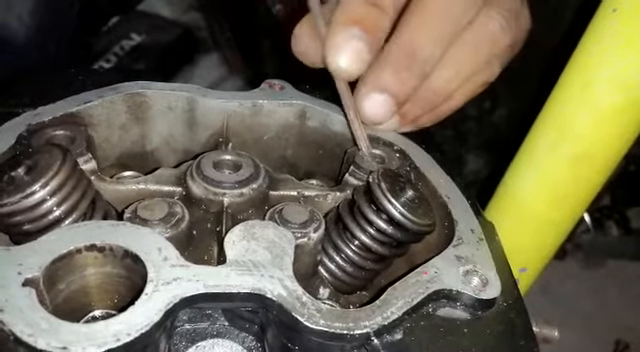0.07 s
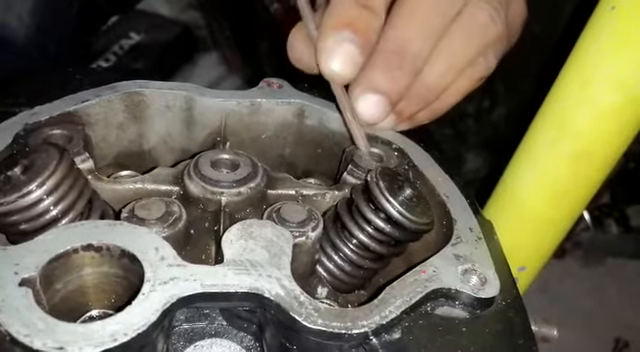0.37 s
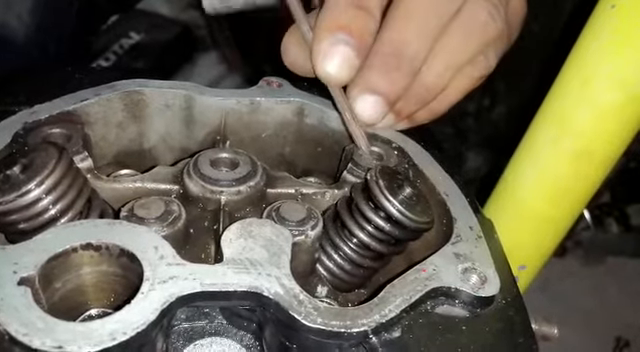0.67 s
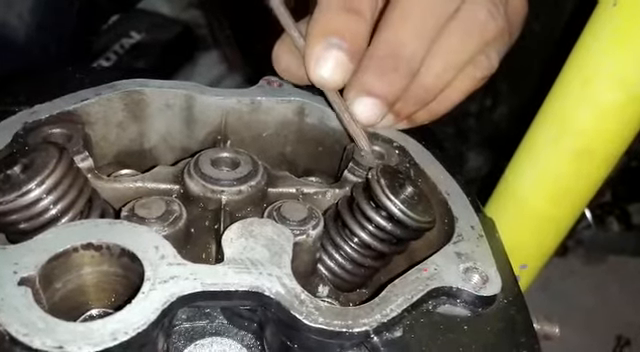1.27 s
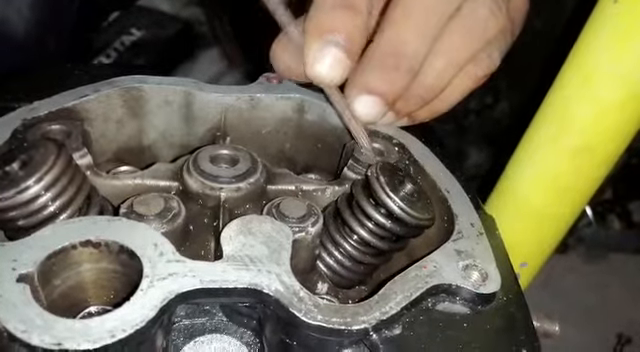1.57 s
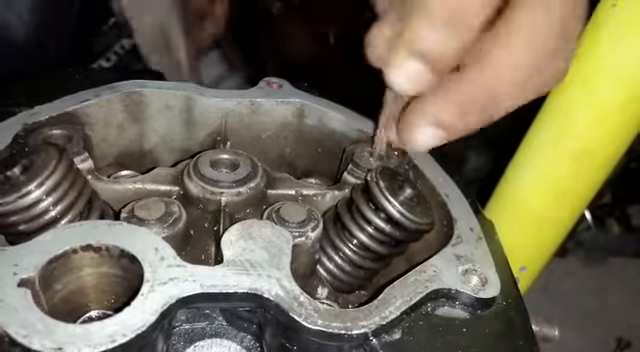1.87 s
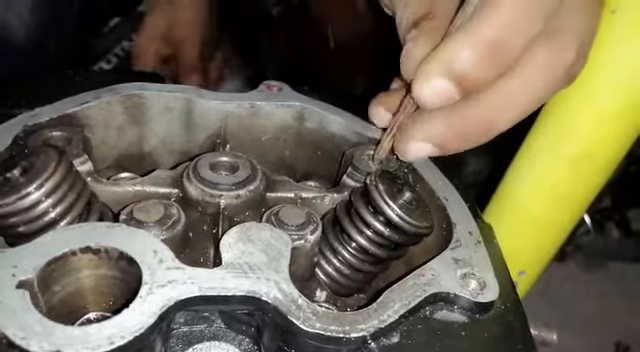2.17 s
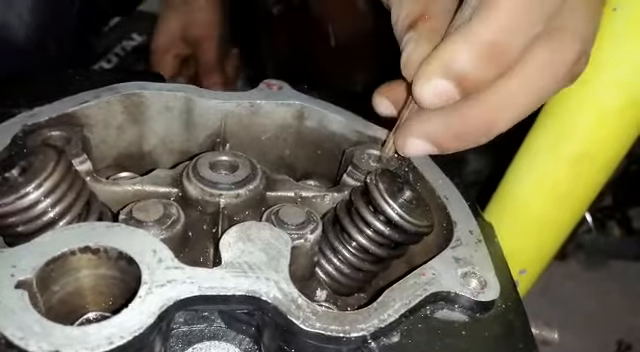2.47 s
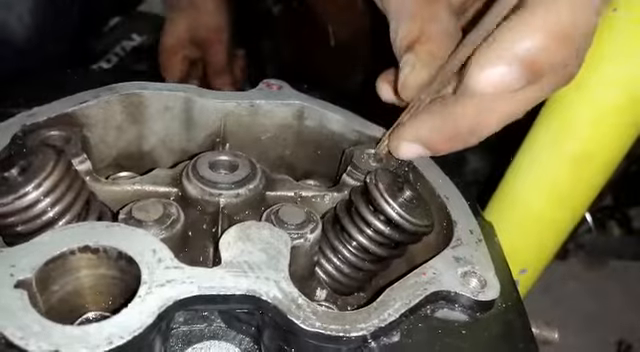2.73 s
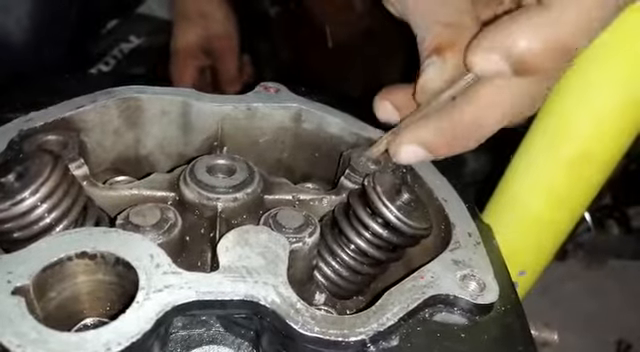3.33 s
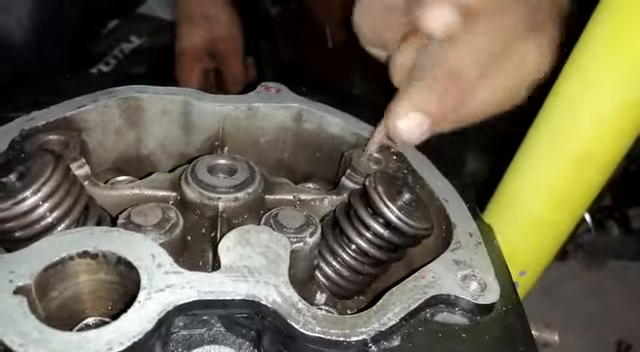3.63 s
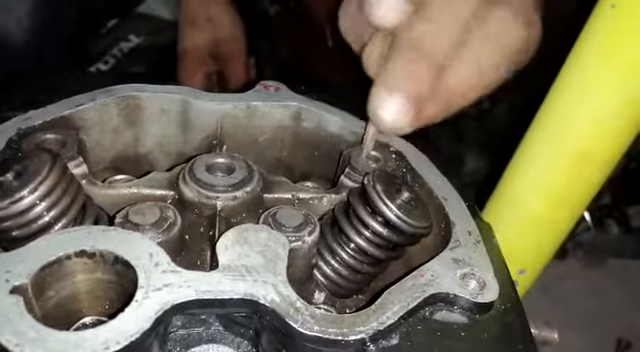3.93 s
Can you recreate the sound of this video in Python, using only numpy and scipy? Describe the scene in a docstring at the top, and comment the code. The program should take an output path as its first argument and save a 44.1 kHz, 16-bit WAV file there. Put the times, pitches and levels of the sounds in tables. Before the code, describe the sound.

A thin steel tool clicks several times against an engine's valve spring, each click ringing briefly. Outside the workshop a small vehicle putters past and fades, leaving a few fainter ticks. The sound sits mostly on the left.

```python
"""A small one-cylinder vehicle putters outside a workshop; it eases off, pulls past and fades away.
Over it come dry clicks, the main sound: a thin steel tool picks at the top of a valve spring on an
open cylinder head, and tool and spring ring briefly. Each click is bursts of noise plus dying tones.
The vehicle is a stack of exhaust tones over throbbing noise. Far traffic and a machine hum lie behind.
The left microphone hears everything far louder than the right."""
import sys
import numpy as np
from scipy import signal
from scipy.fft import rfft, irfft
from scipy.io import wavfile

SR = 44100
rng = np.random.default_rng(int(sys.argv[2]) if len(sys.argv) > 2 else 0)


def generate_wav(sig):
    """Save sig (samples, or channels by samples) to the path in sys.argv[1] as 16-bit PCM at SR."""
    pcm = np.round(np.clip(np.atleast_2d(sig).T, -1, 1) * 32767).astype(np.int16)
    wavfile.write(sys.argv[1], SR, pcm)


N = 176400  # 4 s

# tool clicks: t/s, then level/dB of casting knock, tip crack, tool ring, cap ring, coil zing, clack
CLICKS = [(0.4065, -21, -9.5, -18, -10, -13, -1.5), (0.607, -3.5, -5, -2, -1.5, -16, -8),
          (0.854, -6.5, -18.5, -7, -8, -27, -3.5), (1.0643, -4, -0.5, 3, 4.5, -17, -9),
          (1.2933, -1, 2.5, 3.5, 0, -7, -7), (1.5069, 0.5, -1, 1, 3, 0, -1),
          (2.549, -35, -19.5, -19, -16, -38, -17), (3.2005, -22, -11, -28, -10, -1, -13.5)]
# faint slips of the tool tip: t/s, level/dB
SLIPS = [(2.3044, -24), (2.322, -29.5), (2.543, -26), (2.6702, -23.5), (2.8937, -32), (3.1091, -33)]
# tone colour of the four noise bursts in a click: f/Hz, level/dB per Hz
CASTING_KNOCK = [(250, -72), (420, -52.5), (630, -49.5), (1400, -61.5), (3200, -79.5), (4500, -100)]
TIP_CRACK = [(1500, -68.5), (4400, -72), (6400, -65), (8200, -74.5), (9200, -67.5), (12200, -64),
             (15000, -68), (15600, -84)]
RETAINER_CLACK = [(3800, -92), (4400, -66), (5350, -66), (6200, -94)]  # the retainer is the disc that holds the spring
COIL_ZING = [(8400, -86.5), (11400, -62.5), (12400, -58.5), (13600, -77)]
# tones at which tool, valve cap and spring ring: f/Hz, level/dB, time to fade by 60 dB/s
TOOL_TONES = [(9052, -38.5, .1), (9760, -49, .09)]
CAP_TONES = [(5873, -36, .075), (6625, -44.5, .12), (7412, -49, .08)]
SPRING_TONES = [(5110, -44, .12), (5762, -47, .11)]

# engine speed as firings per second: t/s, f/Hz
FIRING_RATE = [(0, 37.9), (.36, 39), (.5, 33), (.62, 30.6), (.85, 32.4), (1.35, 33.2), (1.68, 33.9),
               (2.05, 32.9), (2.85, 31.9), (3.2, 31), (4, 30.4)]
# exhaust tones at 2, 4, 5 and 9 times the firing rate, and the high ones as a group: t/s, level/dB
SECOND_LEVEL = [(0, -42.5), (.6, -42.5), (1, -34), (1.35, -26.5), (1.54, -25), (1.71, -52.5),
                (1.871, -32.5), (2.08, -57.5), (2.41, -32), (2.65, -44.5), (4, -54.5)]
FOURTH_LEVEL = [(0, -36), (0.399, -26), (.6, -42.5), (1.299, -33.5), (2.05, -58), (2.4, -51), (2.9, -32),
                (4, -40)]
FIFTH_LEVEL = [(0, -26.5), (.36, -23), (.58, -32), (1, -18.5), (1.27, -20), (1.38, -28.5), (1.48, -21),
               (1.65, -34), (1.768, -22), (2.3, -26), (2.42, -38.5), (2.8, -36), (3.2, -43), (4, -45)]
NINTH_LEVEL = [(0, -33), (.6, -49), (1.1, -33.5), (1.2, -19.5), (1.48, -16.5), (1.9, -38), (4, -61.5)]
HIGH_LEVEL = [(0, -40.5), (.6, -42), (1.03, -22), (1.74, -21.5), (2, -31), (2.7, -45), (4, -59.5)]
# more exhaust tones: multiple of the firing rate, level/dB added to FIFTH_LEVEL (low) or HIGH_LEVEL (high)
LOW_TONES = [(1, -27), (3, -24.5), (6, -9), (7, -31.5)]
HIGH_TONES = [(8, -6.5), (10, -12), (11, -7.5), (12, -19.5), (13, -22.5), (14, -15), (15, -27)]
# exhaust and tyre noise as the vehicle passes: t/s, roar level/dB, hiss level/dB
PASS_LEVELS = [(0, -6.5, -10.5), (.36, -6.5, -9.5), (.55, -19.5, -13.5), (.88, 1.5, -2.5), (1.3, 2.5, 2.5),
               (1.55, 2.5, 3), (1.71, -3, -5), (1.87, -5.5, -9), (2.05, -18.5, -13.5), (2.5, -18.5, -16.5),
               (4, -36, -20)]
# sizzle, strongest just after the vehicle passes: t/s, level/dB
SIZZLE_LEVEL = [(.55, -32), (.8, -5), (1.639, 3), (2.05, -27.5), (4, -27)]
# tone colour of the vehicle's three noises: f/Hz, level/dB per Hz
ROAR_COLOUR = [(30, -77), (100, -70), (170, -49.5), (380, -56), (540, -65), (700, -65.5), (1000, -76.5),
               (1500, -87.5), (6000, -125)]
HISS_COLOUR = [(800, -105), (1500, -97), (2700, -92), (4500, -100), (8200, -104), (10000, -100.5),
               (15500, -107.5)]
SIZZLE_COLOUR = [(4500, -115), (5600, -89), (7300, -99), (8200, -118)]
# narrow bands of gear whine: f/Hz, level/dB added to the hiss level
GEAR_BANDS = [(2150, -61.5), (3210, -59.5)]

# far traffic heard in the workshop: f/Hz, level/dB per Hz
FAR_TRAFFIC = [(20, -74.5), (90, -65), (135, -61), (200, -73.5), (350, -76), (500, -83.5), (750, -86.5),
               (1200, -94.5), (2000, -103), (3200, -102), (3900, -110), (5300, -107), (7500, -119),
               (15000, -118)]
# tones of a humming machine: f/Hz, level/dB
MACHINE_HUM = [(333.8, -58.5), (667.5, -60), (1001, -67)]
# the right microphone compared with the left: f/Hz, level/dB
RIGHT_MIC_COLOUR = [(60, -7), (160, -13), (320, -10.5), (600, -18.5), (2000, -21.5), (6000, -37.5),
                    (15000, -27.5)]
# each microphone's own hiss: f/Hz, level/dB per Hz
MIC_HISS = [(20, -74.5), (600, -104), (1500, -111), (3200, -111), (3900, -118), (7800, -124), (15000, -116)]

ATTACK_S, ROOM_T60_S = 0.00093, 0.2  # a "t60" is the time a sound takes to fade by 60 dB
RING_SPREAD_DB, SLIP_CRACK_DB = 2, -1.5
SPEED_JITTER, PUFF_DEPTH = 0.007, 0.11  # shares of the firing rate and of the noise strength
FADING_DB, ROUGH_DB, FLUTTER_DB = 2.3, 0.9, 1.6  # typical size of the random wobbles in level
WHINE_WIDTH_HZ, DOPPLER_SHARE, CLOSEST_S, PASSING_S = 140, 0.044, 1.3, 0.13
SHARED_BASS_HZ, RIGHT_LEAD_S, SCATTER_S, CUTOFF_HZ = 407, 0.00096, 0.0061, 15850


def tool():
    """Steel strikes steel: each click is four short noises plus the ring of tool, cap and spring."""
    times, knock_db, crack_db, tool_db, cap_db, zing_db, clack_db = np.transpose(CLICKS)
    slips = strikes(*np.transpose(SLIPS))
    cracks = strikes(times, crack_db) + from_db(SLIP_CRACK_DB) * slips
    sound = burst(strikes(times, knock_db), CASTING_KNOCK, t60=0.057, room_db=-7.5)
    sound += burst(cracks, TIP_CRACK, t60=0.038, room_db=-25)
    sound += burst(strikes(times, clack_db) + slips, RETAINER_CLACK, t60=0.038, room_db=-25)
    sound += burst(strikes(times, zing_db), COIL_ZING, t60=0.027, room_db=-25)
    # slips also brush the cap and the spring into ringing, but not the tool
    parts = [(TOOL_TONES, tool_db, 0), (CAP_TONES, cap_db, slips), (SPRING_TONES, clack_db, slips)]
    for tones, blow_db, brush in parts:
        for hz, db, t60 in tones:
            uneven_db = RING_SPREAD_DB * rng.standard_normal(len(times))
            blows = strikes(times + ATTACK_S, blow_db + uneven_db)
            sound += from_db(db) * ring(blows + brush, hz, t60)
    return sound


def vehicle():
    """The exhaust drones, while roar, hiss, whine and sizzle throb with each firing of the engine."""
    firing_hz = over_time(FIRING_RATE) * (1 + SPEED_JITTER * wobble(9.3))
    phase = 2 * np.pi * np.cumsum(firing_hz) / SR  # one turn per firing
    drone = exhaust(phase)
    roar = from_db(over_time(PASS_LEVELS, column=1)) * noise(ROAR_COLOUR)
    hiss = from_db(over_time(PASS_LEVELS, column=2)) * (noise(HISS_COLOUR) + gear_whine())
    sizzle = from_db(over_time(SIZZLE_LEVEL) + FLUTTER_DB * wobble(28)) * noise(SIZZLE_COLOUR)
    roughness = from_db(ROUGH_DB * wobble(17))  # firings are not all equally strong
    throb = 1 + PUFF_DEPTH * np.cos(phase)
    return drone * roughness + throb * (roar + hiss + sizzle)


def exhaust(phase):
    """Regular puffs make tones at multiples of the firing rate; each swells and fades along the way."""
    tones = [(2, over_time(SECOND_LEVEL)), (4, over_time(FOURTH_LEVEL)),
             (5, over_time(FIFTH_LEVEL)), (9, over_time(NINTH_LEVEL))]
    tones += [(multiple, over_time(FIFTH_LEVEL) + db) for multiple, db in LOW_TONES]
    tones += [(multiple, over_time(HIGH_LEVEL) + db) for multiple, db in HIGH_TONES]
    drone = 0
    for multiple, db in tones:
        strength = from_db(db + FADING_DB * wobble(5.24))
        drone += strength * np.sin(multiple * phase + 2 * np.pi * rng.random())
    return drone


def gear_whine():
    """Gears whine in narrow bands of noise that drop in pitch as they go by (the Doppler effect)."""
    t = np.arange(N) / SR
    pitch_bend = 1 - DOPPLER_SHARE * np.tanh((t - CLOSEST_S) / PASSING_S)
    phase_per_hz = 2 * np.pi * np.cumsum(pitch_bend) / SR
    lowpass = signal.butter(2, WHINE_WIDTH_HZ, fs=SR, output="sos")
    whine = 0
    for hz, db in GEAR_BANDS:
        a, b = signal.sosfilt(lowpass, rng.standard_normal((2, N)))  # two slow noises, moved up to hz
        band = (a * np.cos(hz * phase_per_hz) + b * np.sin(hz * phase_per_hz)) / a.std()
        whine += from_db(db + FLUTTER_DB * wobble(30)) * band
    return whine


def workshop():
    """Far traffic and a faint, wavering machine hum."""
    t = np.arange(N) / SR
    traffic = noise(FAR_TRAFFIC)
    hum = sum(from_db(db) * np.sin(2 * np.pi * hz * t + wobble(1.7)) for hz, db in MACHINE_HUM)
    return traffic + hum


def strikes(times, db):
    """A one-sample spike for each blow."""
    spikes = np.zeros(N)
    spikes[(np.asarray(times) * SR).astype(int)] = from_db(db)
    return spikes


def burst(blows, spectrum, t60, room_db):
    """A blow starts so many short tones that they blur into noise; the room adds a longer tail."""
    t = np.arange(SR // 2) / SR
    rise = np.minimum(t / ATTACK_S, 1)
    direct = from_db(-60 * t / t60)
    room_tail = from_db(room_db - 60 * t / ROOM_T60_S)
    return signal.fftconvolve(blows, rise * np.hypot(direct, room_tail))[:N] * noise(spectrum)


def ring(blows, hz, t60):
    """Struck metal rings: each spike starts a dying tone of the same height."""
    decay = from_db(-60 / (t60 * SR))
    step = 2 * np.pi * hz / SR
    return signal.lfilter([0, np.sin(step)], [1, -2 * decay * np.cos(step), decay ** 2], blows + 1e-18)


def from_db(db):
    """Turn decibels into a factor to multiply by."""
    return 10 ** (np.asarray(db) / 20)


def over_time(table, column=1):
    """Join a table's points with straight lines, giving one value per sample."""
    columns = np.transpose(table)
    return np.interp(np.arange(N) / SR, columns[0], columns[column])


def colour(sound, table):
    """Turn each frequency up or down by a table of f/Hz, level/dB."""
    hz, db = np.transpose(table)
    bin_hz = np.maximum(np.arange(N // 2 + 1) * SR / N, 1)
    gain = from_db(np.interp(np.log(bin_hz), np.log(hz), db))
    return irfft(rfft(sound) * gain, N)


def noise(spectrum):
    """Steady noise shaped by a table of f/Hz, level/dB per Hz."""
    return colour(rng.standard_normal(N), spectrum) * np.sqrt(SR / 2)


def wobble(rate_hz):
    """A smooth random wander of typical size 1, mostly slower than rate_hz."""
    hop, warm_up = 40, 2000  # one random value every 40 samples
    memory = np.exp(-2 * np.pi * rate_hz * hop / SR)
    draws = rng.standard_normal(N // hop + warm_up + 2)
    slow = signal.lfilter([1], [1, -2 * memory, memory ** 2], draws)[warm_up:]
    return np.interp(np.arange(N) / hop, np.arange(len(slow)), slow / slow.std())


def scene():
    """The left side hears it all; the right is weak and dull, its bass early and its treble smeared."""
    t = np.arange(N) / SR
    left = tool() + vehicle() + workshop()
    bass = signal.sosfiltfilt(signal.butter(2, SHARED_BASS_HZ, fs=SR, output="sos"), left)
    early_bass = np.interp(t + RIGHT_LEAD_S, t, bass)
    scatter = rng.standard_normal(N) * np.exp(-t / SCATTER_S)
    smeared_treble = signal.fftconvolve(left - bass, scatter / np.linalg.norm(scatter))[:N]
    right = colour(early_bass + smeared_treble, RIGHT_MIC_COLOUR)
    return np.array([left, right])


def record(dry):
    """Each microphone adds its own hiss, and the very highest treble is cut off."""
    hiss = np.array([noise(MIC_HISS), noise(MIC_HISS)])
    lowpass = signal.ellip(10, .1, 80, CUTOFF_HZ, fs=SR, output="sos")
    return signal.sosfilt(lowpass, dry + hiss)


dry = scene()
out = record(dry)
generate_wav(out)
```